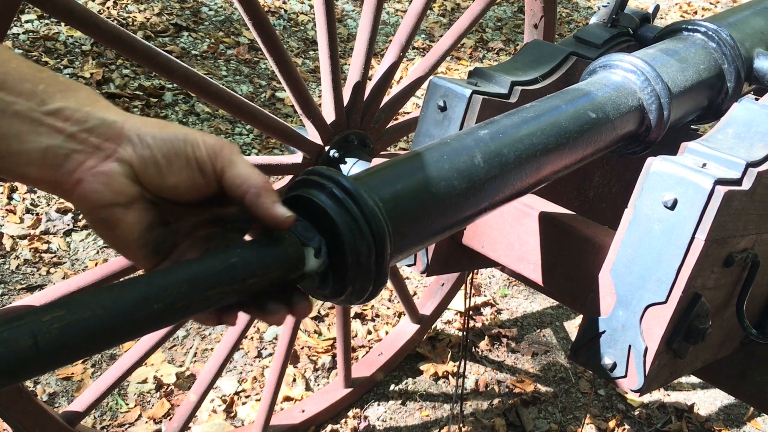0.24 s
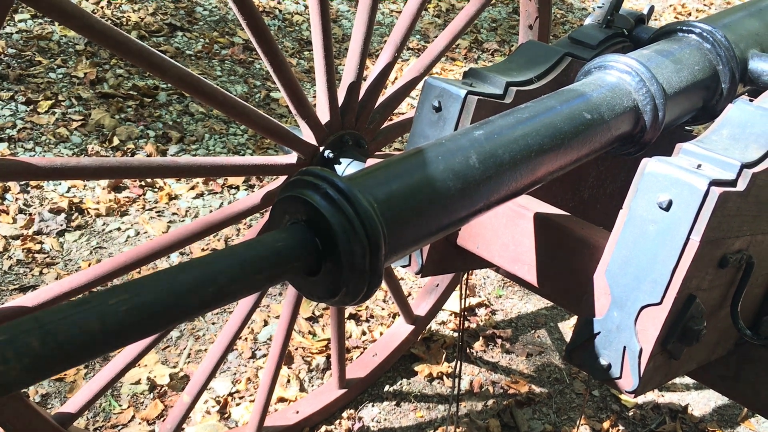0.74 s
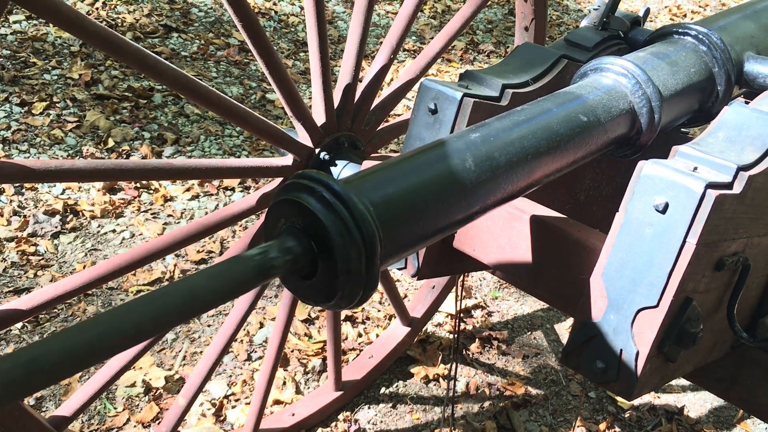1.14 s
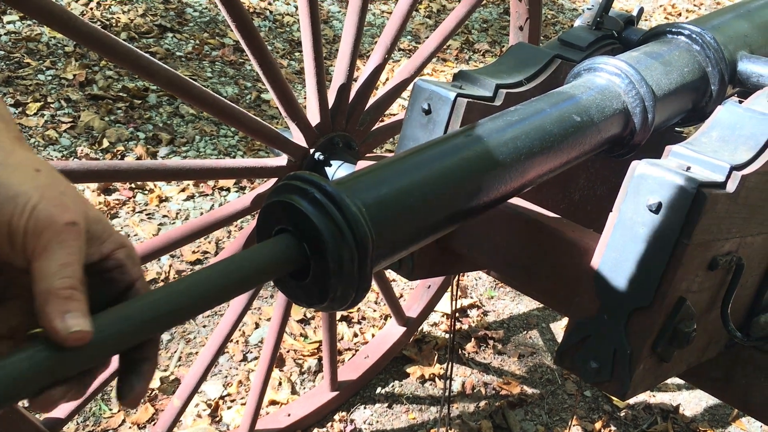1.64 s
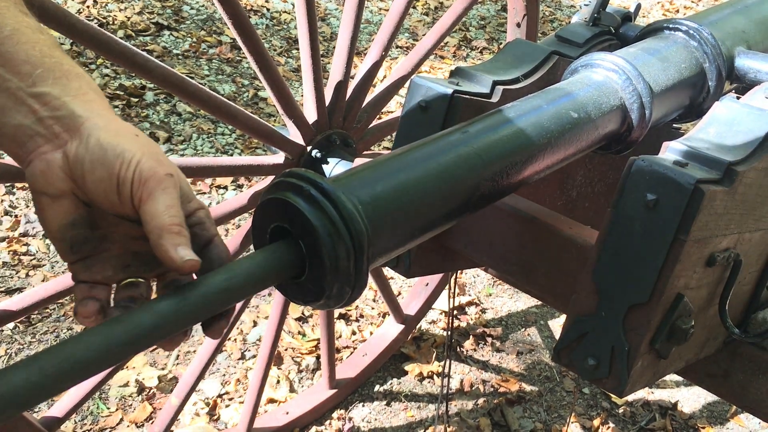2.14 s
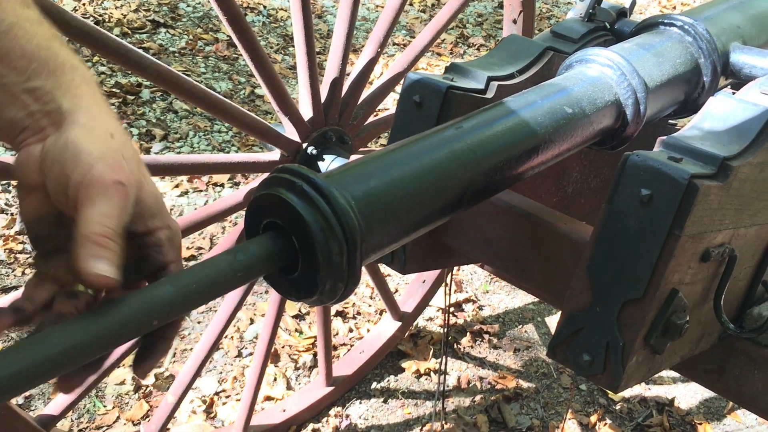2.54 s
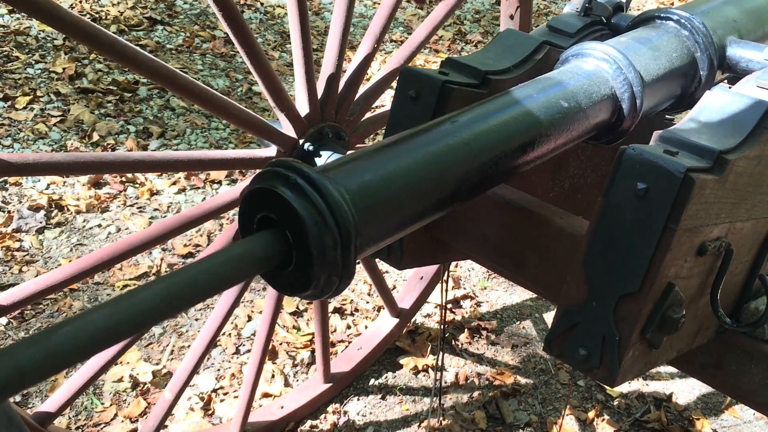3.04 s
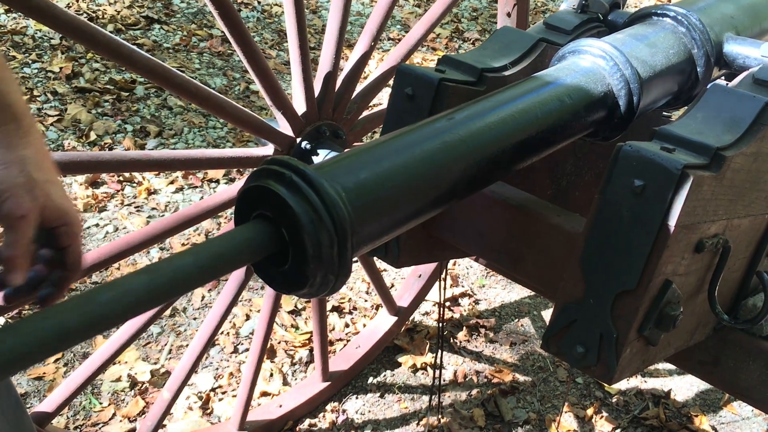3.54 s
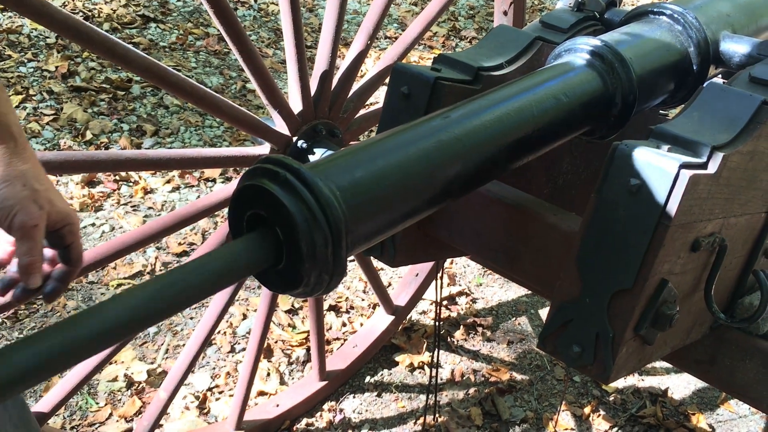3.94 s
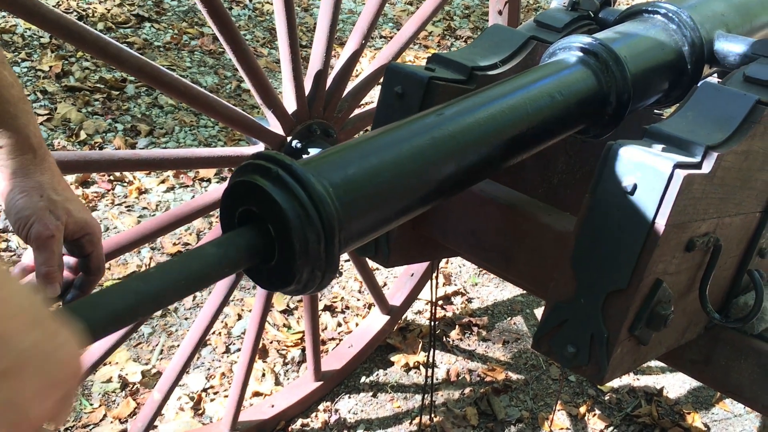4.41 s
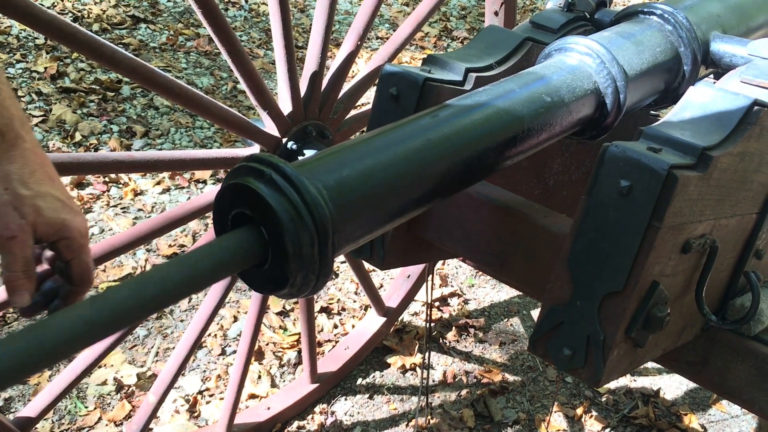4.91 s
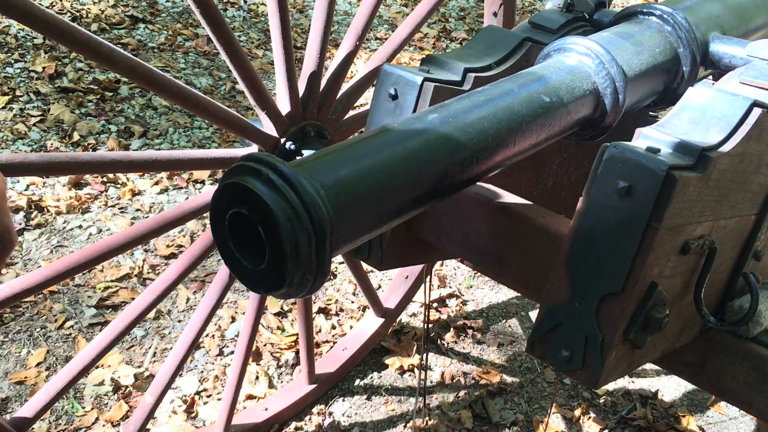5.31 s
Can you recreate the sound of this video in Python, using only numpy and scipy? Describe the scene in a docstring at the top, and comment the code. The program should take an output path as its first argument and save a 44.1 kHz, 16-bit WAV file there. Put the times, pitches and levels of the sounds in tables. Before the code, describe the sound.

Close up in a still wood, with insects faint in the distance, a rod scrapes and hisses down a cannon's iron bore with small catches and snaps of grit. It is then rammed three times, each blow a hard crack with a brief hollow thud, the first and last followed by a clank of the shaft. A quick rising scrape and a soft pop mark the rod being pulled free.

```python
"""In a quiet wood with far insects, a ramrod is pushed down the iron bore of a small cannon.
Its head scrapes by stick-slip friction while the air column in front of it lengthens and sinks in pitch.
The head catches and puffs the air, grit snaps, and the shaft clanks against the muzzle.
Three rams follow, at 3.2, 3.7 and 4.2 s: each impact cracks in the rod and booms in the bore.
The rod is drawn out, the column shortens and rises in pitch, and the head leaves with a soft pop."""
import sys
import numpy as np
from scipy import signal
from scipy.fft import rfft, irfft
from scipy.io import wavfile
from scipy.ndimage import uniform_filter1d

SR = 44100
rng = np.random.default_rng(int(sys.argv[2]) if len(sys.argv) > 2 else 0)


def output_pcm(signal):
    """Save a mono or channel-first signal as 16-bit PCM at the path in sys.argv[1].

    Samples are clipped to [-1, 1] before scaling.
    """
    pcm = np.clip(np.atleast_2d(signal).T, -1, 1) * 32767
    wavfile.write(sys.argv[1], SR, np.round(pcm).astype(np.int16))


N = 245479
TIME = np.arange(N) / SR
RING_TIME = np.arange(SR // 2) / SR  # seconds since an impact

# spectrum of grit under the rod: (frequency [Hz], level [dB])
GRIT_SPECTRUM = [(500, -31), (2500, -4), (6000, -4), (10000, -5.5), (16000, -11.5)]


def amp(db):
    """Amplitude grows tenfold every 20 dB."""
    return 10 ** (np.asarray(db) / 20)


def unit_rms(x):
    """Normalisation to a mean power of 1."""
    return x / np.sqrt(np.mean(x ** 2) + 1e-20)


def response(spectrum, hz):
    """Frequency response through (frequency [Hz], level [dB]) points, falling steeply past the ends."""
    f, db = np.transpose(spectrum)
    beyond = np.minimum((hz + 1) / f[0], 1) * np.minimum(f[-1] / (hz + 1), 1)
    return amp(np.interp(np.log(hz + 1), np.log(f), db)) * beyond ** 2


def shaped(x, spectrum):
    """Linear filtering multiplies spectra; the result has rms 1."""
    hz = np.fft.rfftfreq(len(x), 1 / SR)
    return unit_rms(irfft(rfft(x) * response(spectrum, hz), len(x)))


def add(mix, start, sound):
    """Superposition: a sound joins the mix at start seconds."""
    part = mix[round(start * SR):][:len(sound)]
    part += sound[:len(part)]


def wander(cutoff_hz):
    """Low-passed noise gives a random fluctuation of rms 1."""
    hz = np.fft.rfftfreq(N, 1 / SR)
    return unit_rms(irfft(rfft(rng.standard_normal(N)) / (1 + (hz / cutoff_hz) ** 4), N))


def decay(t60):
    """Damping: an exponential fall of 60 dB in t60 seconds."""
    return np.exp(-np.log(1000) * RING_TIME / t60)


def ring(modes):
    """Free vibration is a sum of damped sines: (frequency [Hz], level [dB], t60 [s])."""
    return sum(amp(db) * decay(t60) * np.sin(2 * np.pi * hz * RING_TIME) for hz, db, t60 in modes)


def woods(level_db=-64.5):
    """Stationary background noise: still woods with a band of far insects."""
    # ambient spectrum: (frequency [Hz], level [dB])
    spectrum = [(20, -18.5), (60, 3.5), (150, -6.5), (400, -13), (1000, -18.5), (2500, -22.5), (5600, -30),
                (6400, -27.5), (6850, -20.5), (7400, -34.5), (9000, -29.5), (15800, -37.5)]
    return amp(level_db) * shaped(rng.standard_normal(N), spectrum)


def friction(rough_db, grain_hz):
    """Stick-slip friction: tiny uneven slips modulate the level of a noise."""
    return rng.standard_normal(N) * amp(rough_db * wander(grain_hz))


def through_bore(x, patchy_db, fade_hz=5000, size=1024):
    """Quarter-wave resonance: the odd modes of a pipe shut by the rod's head sink as it goes deeper."""
    # air column: (time [s], length [m], reflection at the muzzle [ratio])
    column = [(.6, 0.07, .2), (1.05, .17, .25), (1.4, 0.24, .42), (1.699, 0.33, 0.45), (1.848, 0.37, 0.6),
              (2.3, .66, 0.33), (3.2, .915, .7), (4.7, 0.91, .7), (5.029, .2, .65)]
    times, length, reflection = np.transpose(column)
    frames = dict(fs=SR, nperseg=size, noverlap=size * 3 // 4)
    hz, t, spectra = signal.stft(x, **frames)
    round_trip = 2 * np.interp(t, times, length) / 343  # sound travels at 343 m/s
    echo = np.interp(t, times, reflection) / (1 + (hz[:, None] / fade_hz) ** 2)  # treble escapes
    pipe = 1 / (1 + echo * np.exp(-2j * np.pi * hz[:, None] * round_trip))
    patches = uniform_filter1d(rng.standard_normal(spectra.shape), size=7, axis=0)
    patches = unit_rms(uniform_filter1d(patches, size=8, axis=1))  # the contact shifts in patches
    return signal.istft(spectra * pipe * amp(patchy_db * patches), **frames)[1][:N]


def stroke_speed(start, length, rise, fall):
    """Uniform acceleration: the rod speeds up, glides and slows to a stop (0 to 1)."""
    t = TIME - start
    return np.clip(np.minimum(t / rise, (length - t) / fall), 0, 1)


def sliding(fine_hz=11000, catches_per_s=22, catch_db=5.5, catch_t60=0.024):
    """Friction noise grows as a power of speed: rumble and scrape in the bore, rasp and hiss at its mouth."""
    # friction spectra: (frequency [Hz], level [dB])
    rumble_spectrum = [(40, -24.5), (100, -5), (180, -3), (330, -6), (500, -18.5), (900, -35)]
    scrape_spectrum = [(250, -22.5), (500, -4.5), (750, -2.5), (1300, -0.5), (2000, 0.5), (2400, -4.5),
                       (3200, -37.5)]
    rasp_spectrum = [(1700, -24), (2450, 1), (2800, -5), (3500, -2), (4200, -1), (4650, -4), (5100, -9),
                     (5700, -6), (7000, -22)]
    hiss_spectrum = [(4200, -16.5), (5700, -3), (6900, 1), (7400, -3.5), (8600, -2), (9700, -1.5),
                     (10400, -8.5), (11600, -3), (13500, -8.5), (15800, -12)]
    # strokes of the rod: (start [s], length [s], rise [s], fall [s],
    # rumble [dB], scrape [dB], rasp [dB], hiss [dB], extra hiss above fine_hz [dB])
    strokes = [ (0.355, .13, 0.057, 0.041, -80, -81, -71, -67, 9),
               (.50, 0.59, .12, .1, -92, -75.5, -73, -75, 5),
               (0.721, 0.96, .42, 0.34, -64.5, -54.5, -56, -53, -1),
               (1.465, 0.55, 0.12, .12, -63, -58, -58, -60, 5),
               (2.008, .32, 0.097, 0.023, -57, -54, -55, -56.5, -5.5),
               (2.282, 0.23, 0.045, 0.22, -76, -72, -59, -54.5, 5.5),
               (2.482, 0.42, 0.3, 0.13, -61, -55, -53.5, -51.5, 4.5),
               (2.80, 0.35, 0.16, 0.046, -56.5, -55, -53.5, -55.5, -2),
               (3.104, 0.088, 0.047, .005, -64, -51.5, -46, -55, -2),
               (3.27, .2, .02, .05, -66.5, -66.5, -71, -86, -3),
               (3.376, 0.25, 0.058, 0.061, -60, -56.5, -57.5, -63, -8),
               (3.615, 0.14, 0.12, 0.013, -53.5, -43.5, -43, -51, -1),
               (3.78, .37, .04, 0.038, -66, -65.5, -68.5, -78.5, -6),
               (3.869, 0.22, 0.059, 0.035, -66, -56, -53.5, -55, -9),
               (4.131, .095, 0.044, 0.0079, -59, -47.5, -48, -52.5, -1.5),
               (4.281, 0.14, 0.019, 0.077, -53, -62.5, -72.5, -87, -5),
               (4.386, .24, .04, 0.12, -71, -72.5, -66.5, -64, -1),
               (4.675, 0.14, 0.033, 0.043, -70.5, -65, -63, -65, -1),
               (4.765, .16, 0.1, 0.068, -58.5, -47.5, -47.5, -49.5, -3.5),
               (4.856, 0.16, 0.12, 0.043, -69.5, -54.5, -44.5, -43.5, -2),
               (4.993, .20, 0.021, 0.037, -68.5, -68, -60, -57, 2),
               (5.274, 0.24, 0.098, 0.013, -72, -62, -59, -57, 3), ]
    # exponents of speed: (rumble [-], scrape [-], rasp [-], hiss [-])
    exponents = (0.701, .95, 1.05, 1.299)
    rumble = shaped(friction(rough_db=2.2, grain_hz=25), rumble_spectrum)
    scrape = shaped(through_bore(friction(1.6, 300), patchy_db=2.5), scrape_spectrum)
    rasp = shaped(through_bore(friction(1.8, 500), patchy_db=2.0), rasp_spectrum)
    hiss = shaped(through_bore(friction(1.5, 900), patchy_db=2.5), hiss_spectrum)
    fine = signal.sosfiltfilt(signal.butter(2, fine_hz, "high", fs=SR, output="sos"), hiss)
    power = np.zeros((5, N))
    for start, length, rise, fall, *levels, fine_db in strokes:
        speed = stroke_speed(start, length, rise, fall)
        moving = speed > 0
        gains = [amp(db) * speed[moving] ** exponent for db, exponent in zip(levels, exponents)]
        fine_gain = gains[-1] * amp(fine_db)
        power[:, moving] += np.square(gains + [fine_gain])  # overlapping strokes add in power
    rumble, scrape, rasp, hiss, fine = np.sqrt(power) * [rumble, scrape, rasp, hiss - fine, fine]
    catches = (rng.random(N) < catches_per_s / SR) * rng.random(N)  # grit grips the head at random
    grip = 1 + (amp(catch_db) - 1) * signal.oaconvolve(catches, decay(catch_t60))[:N]
    judder = amp(0.8 * wander(32))  # the hand does not push evenly
    return rumble + judder * (grip * (scrape + rasp) + hiss + fine)


def scatter(x, low_db=-27, low_t60=0.06, low_hz=450, broad_db=-31, broad_t60=0.16):
    """Scattering from ground, carriage and trees adds a short bass tail and a longer broadband one."""
    low = signal.sosfilt(signal.butter(2, low_hz, fs=SR, output="sos"), rng.standard_normal(len(RING_TIME)))
    broad = rng.standard_normal(len(RING_TIME))
    onset = 1 - np.exp(-RING_TIME / 0.004)
    tail = 0
    for band, db, t60 in [(low, low_db, low_t60), (broad, broad_db, broad_t60)]:
        envelope = onset * decay(t60)
        tail += amp(db) * band * envelope / np.linalg.norm(envelope)
    return signal.fftconvolve(x, tail)[:N]


def scuffs():
    """Forced resonance: each swell of friction drives one band of the rod, squeaking if it is narrow."""
    # grips of the rod: (time [s], level [dB], centre [Hz], bandwidth [Hz], half-length [s])
    swells = [(0.41, -67, 4400, 450, 0.036), (1.32, -58.5, 3680, 600, 0.2),
              (1.812, -55.5, 1450, 1000, 0.037), (2.256, -44.5, 1500, 900, 0.021),
              (2.729, -46.5, 2200, 1500, 0.0084), (2.931, -43, 2960, 2500, 0.004),
              (3.007, -55.5, 5800, 700, 0.036), (3.525, -48, 1572, 700, 0.0096),
              (3.695, -46, 4040, 650, 0.035), (4.215, -41, 2400, 4170, 0.021),
              (4.798, -47, 1600, 197.7, 0.0085), (4.851, -51.5, 2520, 200, 0.034),
              (5.033, -44.5, 3626, 3600, 0.022), (5.04, -41, 9900, 6950, 0.015)]
    out, hz = np.zeros(N), np.fft.rfftfreq(N, 1 / SR)
    drive = rfft(through_bore(friction(rough_db=6.0, grain_hz=500), patchy_db=5.5))
    for time, db, centre_hz, width_hz, half_length in swells:
        band = unit_rms(irfft(drive / (1 + (2 * (hz - centre_hz) / width_hz) ** 2), N))
        out += amp(db) * np.exp(-((TIME - time) / half_length) ** 2) * band
    return out


def pops(rise_s=0.0054, step_db=-7, count=4):
    """A stopped pipe rings in odd harmonics when the head catches and puffs its air."""
    # puffs: (time [s], level [dB], fundamental [Hz], t60 [s])
    puffs = [(1.749, -35, 185, 0.037), (1.837, -40, 163, 0.091), (2.007, -35, 150, 0.024),
             (2.287, -39.5, 118, 0.13), (5.058, -42, 95.6, 0.33)]
    out = np.zeros(N)
    for time, db, hz, t60 in puffs:
        harmonics = [(hz * (2 * k + 1), db + step_db * k, t60) for k in range(count)]
        add(out, time, ring(harmonics) * (1 - np.exp(-RING_TIME / rise_s)))
    return out


def grit_burst(db, t60):
    """A brief contact with grit radiates a decaying broadband noise."""
    return amp(db) * shaped(rng.standard_normal(len(RING_TIME)), GRIT_SPECTRUM) * decay(t60)


def ticks():
    """Grit snaps under the rod; so short a transient has a wide, bright spectrum."""
    # snaps of grit: (time [s], level [dB])
    snaps = [(2.467, -40.5), (2.4930, -46.5), (2.5150, -45), (2.7860, -38), (2.8544, -37), (2.929, -40),
             (3.364, -49.5), (3.4085, -50.5), (3.517, -52), (3.7962, -44.5)]
    out = np.zeros(N)
    for time, db in snaps:
        add(out, time, grit_burst(db, t60=0.012))
    return out


def clanks(snap_db=1, snap_t60=0.0035, rattle_db=-6, shaft_db=-7, bore_db=-17):
    """Impact excitation: the shaft slaps the muzzle, snaps, rattles and rings both wood and barrel."""
    # slaps: (time [s], level [dB], treble cutoff [Hz], t60 [s])
    slaps = [(2.6511, -31.5, 1800, 0.1), (3.1934, -26, 3500, 0.023), (3.2642, -19.5, 4600, 0.042),
             (3.7850, -36.5, 2500, 0.074), (4.1807, -29, 2200, 0.036), (4.2638, -12.5, 4715, 0.026),
             (4.293, -39.5, 4000, 0.038), (4.4039, -35.5, 1990, 0.048)]
    # spectrum of the contact: (frequency [Hz], level [dB])
    spectrum = [(60, -17.5), (250, -11), (700, -6), (1000, -6), (1200, 0.5), (1550, -10), (1950, 0.5),
                (2600, -3), (3200, 0.5), (3900, 3.5), (5000, 0), (8000, -6), (16000, -4.5)]
    # modes of the wooden shaft: (frequency [Hz], level [dB])
    shaft_modes = [(580, -4.5), (800, -8), (1040, -2), (1140, -3), (1780, -4.5), (1930, -1), (2120, -6),
                   (2500, -2), (3470, -3)]
    out, hz = np.zeros(N), np.fft.rfftfreq(len(RING_TIME), 1 / SR)
    lead = 200  # samples of room ahead of the attack
    for time, db, cutoff_hz, t60 in slaps:
        envelope = amp(rattle_db) * decay(t60) + amp(snap_db) * decay(snap_t60)
        rattle = rng.standard_normal(len(RING_TIME)) * envelope
        colour = unit_rms(response(spectrum, hz) / (1 + (hz / cutoff_hz) ** 3))
        slap = irfft(rfft(np.roll(rattle, lead)) * colour, len(RING_TIME))
        wood = sum((-1) ** k * ring([(*mode, t60)]) for k, mode in enumerate(shaft_modes))
        add(out, time - lead / SR, amp(db) * slap)
        add(out, time, amp(db + shaft_db) * wood + amp(db + bore_db) * boom(tilt_db=0))
    return out


def boom(tilt_db, cut_hz=85):
    """Modes of alternating sign superpose into a pulse that bounces between breech and muzzle."""
    # modes of the barrel's air and wall, and of the wooden carriage: (frequency [Hz], level [dB], t60 [s])
    bore_modes = [(106, -8, 0.17), (290, -4.5, 0.1), (443, -6, 0.078), (650, -2.5, 0.066),
                  (872, -7.5, 0.052), (1032, -8, 0.044), (1195, -8, 0.053), (1427, -3, 0.043),
                  (1630, -2, 0.03), (1775, -3, 0.033), (1972, 0, 0.037), (2207, -4, 0.033),
                  (2353, -16, 0.046)]
    carriage_modes = [(126, -10, 0.055), (184, -16, 0.08)]
    tilted = [(hz, db + tilt_db * np.log2(hz / 700), t60) for hz, db, t60 in bore_modes]
    barrel = sum((-1) ** k * ring([mode]) for k, mode in enumerate(tilted))
    mouth = signal.butter(2, cut_hz, "high", fs=SR, output="sos")  # a high-pass keeps the deepest bass out of the boom
    return signal.sosfilt(mouth, barrel + ring(carriage_modes))


def dispersed(x, lag_s=0.0024, knee_hz=2100):
    """Dispersion: bending waves run faster the higher they are, so treble arrives before bass."""
    hz = np.fft.rfftfreq(len(x), 1 / SR)
    return irfft(rfft(x) * np.exp(-2j * np.pi * lag_s * knee_hz * np.arctan(hz / knee_hz)), len(x))


def rams(crack_t60=0.015, travel_s=0.002382, rebound_s=0.0053, rebound_db=-2, rebound_hz=4400):
    """Two paths from one impact: the head hits the ball, a crack runs up the rod, a boom up the air."""
    # blows: (time [s], boom [dB], boom tilt [dB/octave], crack [dB], crack centre [Hz], steel ring [dB])
    blows = [(3.1991, -11.5, 1, -13, 4010, -17), (3.721, -13, 1.25, -13.5, 3670, -12.5),
             (4.2186, -12, 0, -8, 2725, -26)]
    # modes of the rod's steel: (frequency [Hz], level [dB], t60 [s])
    steel_modes = [(2510, -12.5, .06), (3030, -15.5, 0.025), (3631, -2, 0.048), (3753, 2.5, 0.028),
                   (4060, -4, 0.02)]
    out = np.zeros(N)
    duller = signal.butter(4, rebound_hz, fs=SR, output="sos")
    for time, boom_db, tilt_db, crack_db, crack_hz, steel_db in blows:
        peak = [(crack_hz * 0.82, -14), (crack_hz, 0), (crack_hz * 1.3, -13)]
        spectrum = sorted([(700, -21), (1500, -3), *peak, (9000, -23), (16000, -35)])
        envelope = amp(crack_db) * decay(crack_t60)
        steel = amp(steel_db) * ring(steel_modes)
        contact, rebound = (dispersed(envelope * shaped(noise, spectrum) + steel)
                            for noise in rng.standard_normal((2, len(RING_TIME))))
        add(out, time, contact)
        add(out, time + rebound_s, amp(rebound_db) * signal.sosfilt(duller, rebound))
        add(out, time + travel_s, amp(boom_db) * boom(tilt_db))
        add(out, time, grit_burst(db=-44, t60=0.22))  # the jolted shaft keeps rubbing
    return out


def scene():
    """Direct sound, scattered sound and the woods superpose in the open air."""
    cannon = sliding() + scuffs() + rams() + clanks() + ticks() + pops()
    background = woods()
    return (cannon + scatter(cannon) + background)[None]


def record(dry, ceiling=0.64, edge_hz=16000):
    """Soft saturation rounds the loudest peaks; a low-pass filter then limits the band."""
    rounded = dry / (1 + (dry / ceiling) ** 4) ** (1 / 4)
    low_pass = signal.firwin(511, edge_hz, window=("kaiser", 9), fs=SR)
    return signal.oaconvolve(rounded, low_pass[None], "same")


dry = scene()
out = record(dry)
output_pcm(out)
```